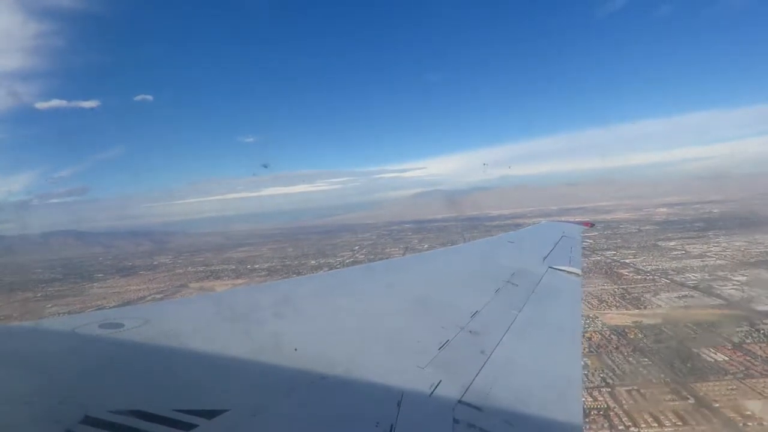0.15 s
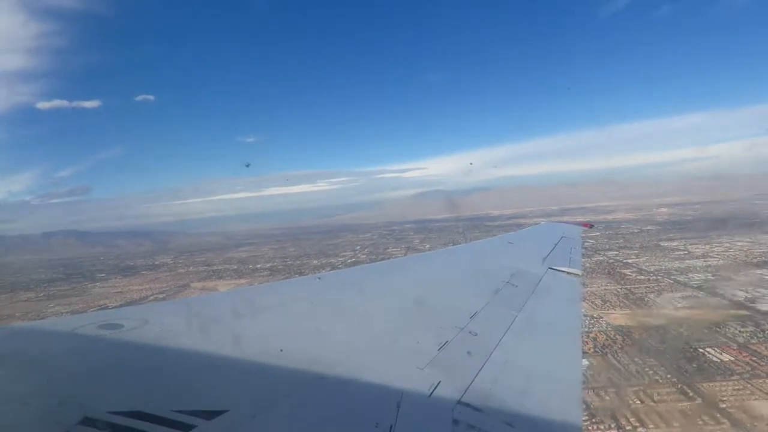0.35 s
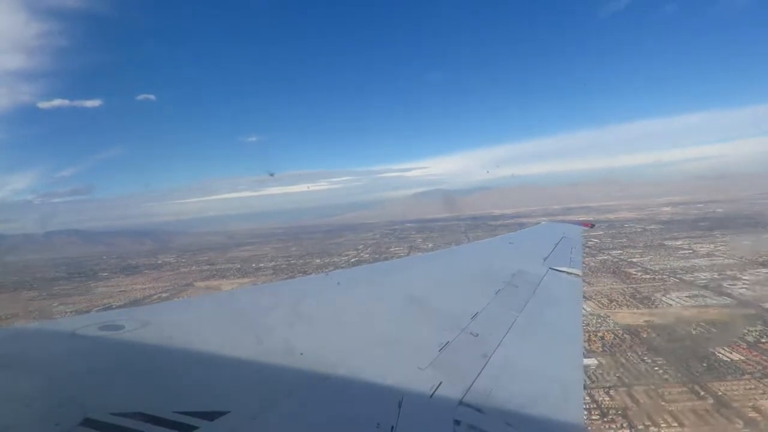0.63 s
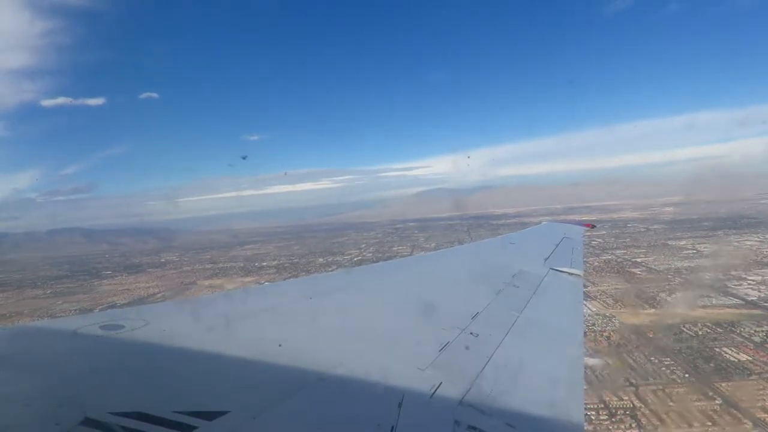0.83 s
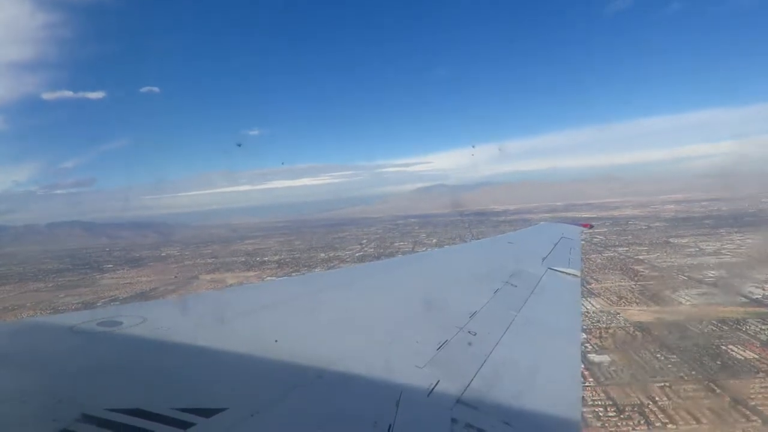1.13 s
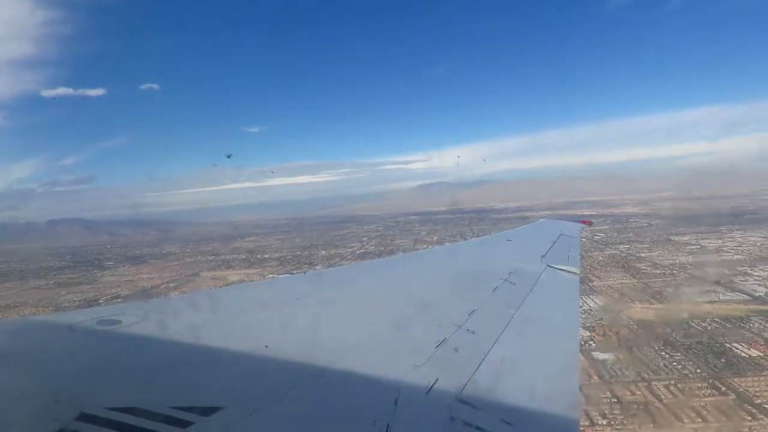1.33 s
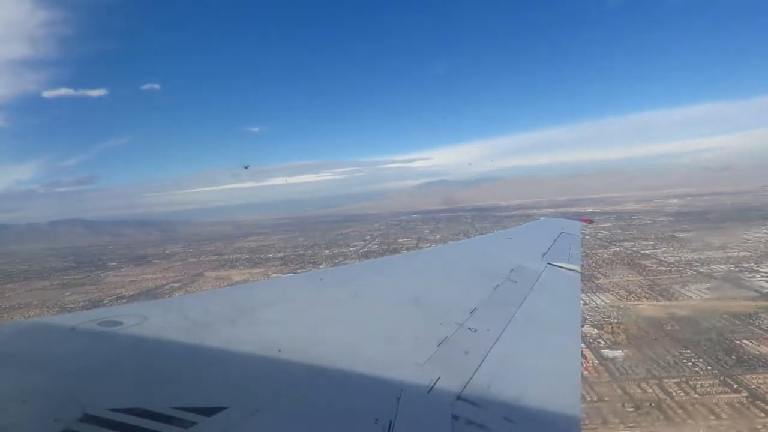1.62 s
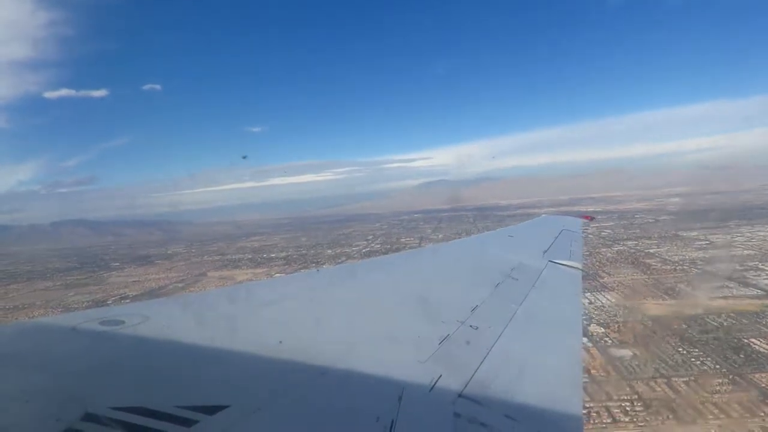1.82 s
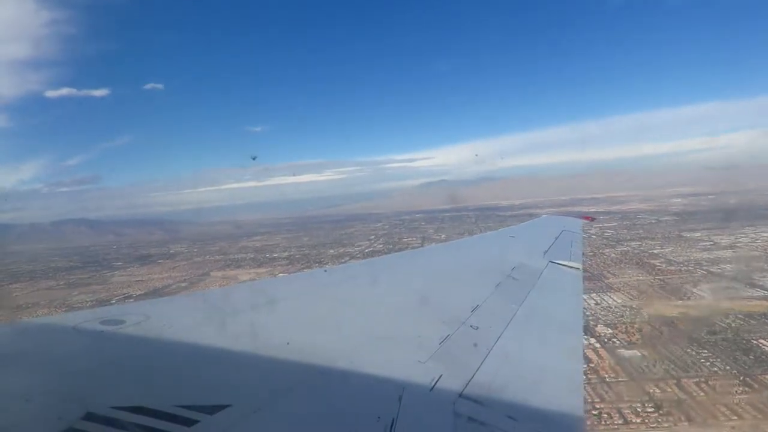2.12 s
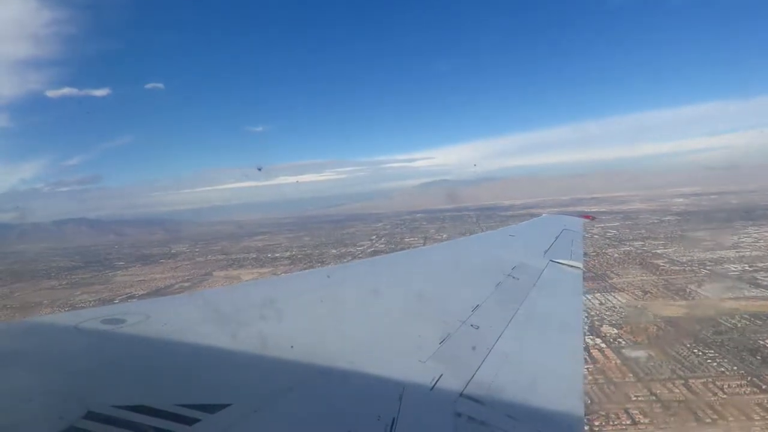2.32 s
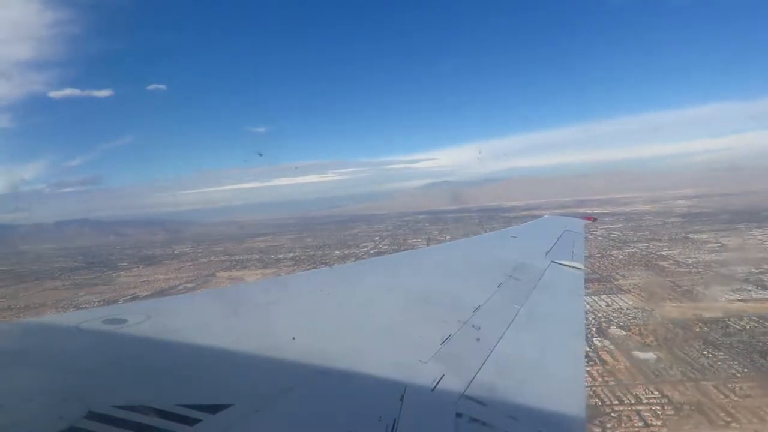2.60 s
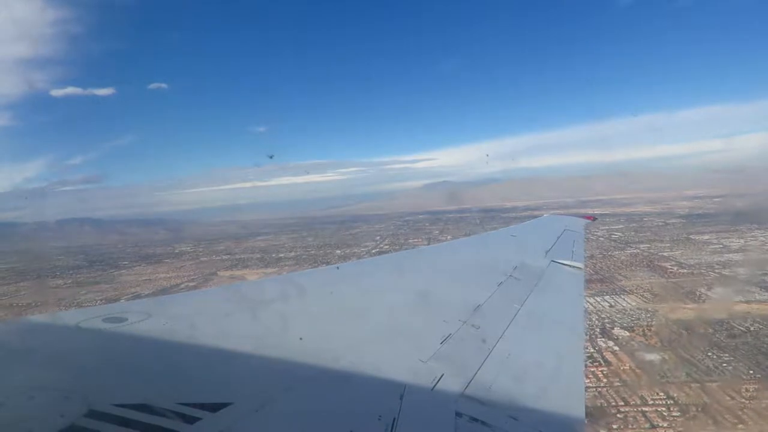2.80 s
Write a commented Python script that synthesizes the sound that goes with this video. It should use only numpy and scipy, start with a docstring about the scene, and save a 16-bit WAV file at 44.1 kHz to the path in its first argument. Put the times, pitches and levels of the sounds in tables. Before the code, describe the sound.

A loud, steady low jet drone fills an airliner cabin, two engine hums slowly beating beneath rumbling, rushing air and soft vent hiss; a few tiny rustles brush close to the microphone.

```python
"""A steady roar and hiss in an airliner cabin during climb, over the slow beating hum of two rear engines.
The engines run at slightly different speeds, so their sine shaft tones beat; higher orders add a thin buzz.
Air rushing over the skin and the vent hiss are noise built from random short-time spectra.
Something small rustles near the microphone a few times: brief puffs of band-passed noise."""
import sys
import numpy as np
from scipy import signal
from scipy.fft import rfft, irfft
from scipy.io import wavfile
from scipy.ndimage import uniform_filter1d, minimum_filter1d

SR = 44100
rng = np.random.default_rng(int(sys.argv[2]) if len(sys.argv) > 2 else 0)


def volts_from_db(level):
    """Convert decibel levels to linear amplitude ratios."""
    exponent = np.asarray(level, float) / 20
    return 10 ** exponent


def dump_mix(stems):
    """Bounce the given channels to the path in sys.argv[1] as a 16-bit WAV at rate SR."""
    frames = np.atleast_2d(stems).T  # one column per channel
    limited = np.clip(frames, -1, 1)  # hard clip at full scale
    pcm = np.round(limited * 32767).astype(np.int16)
    wavfile.write(sys.argv[1], SR, pcm)


N = 130095


def evened(x):
    """Scales to rms 1."""
    return x / np.sqrt(np.mean(x ** 2) + 1e-20)


def read(points, hz):
    """Reads a spectrum table on a log-frequency axis."""
    f, value = np.transpose(points)
    return np.interp(np.log(hz + 1), np.log(f + 1), value)


def drift(top_hz, count):
    """Slow random curves of rms 1: sines over a decade of rates, the slower ones stronger."""
    t = np.arange(0, N + 256, 256) / SR
    rates_hz = np.geomspace(top_hz / 10, top_hz, num=16)[:, None]
    turns = rates_hz * t + rng.random((count, 16, 1))
    slow = (np.sin(2 * np.pi * turns) / np.sqrt(rates_hz)).sum(axis=1)
    return [np.interp(np.arange(N) / SR, t, evened(row)) for row in slow]


def air(spectrum, level, patchy_db, flicker_db, size):
    """Stereo noise from random short-time spectra, with drifting patches and a flicker across all bins."""
    # left-minus-right part against the middle: (frequency [Hz], level [dB])
    side_share = [(30, -35.5), (60, -35), (99, -31.5), (160, -22), (270, -18.5), (450, -14), (740, -14.5),
                  (1220, -13.5), (2010, -8.5), (3330, -12), (5500, -7), (9080, -0.5), (11500, 0.5)]
    # the same, continued into the high treble: (frequency [Hz], level [dB])
    side_treble = [(13300, 2), (13900, 6), (15700, 12)]
    # channel balance: (frequency [Hz], left over right [dB])
    left_over_right = [(60, 0.5), (110, 0.5), (200, 1), (380, -3), (700, 0.5), (1290, -0.5), (2380, 0),
                       (4400, -0.5), (8120, 0.0), (15000, 0)]
    hop = size // 4
    frames, hz = N // hop + 5, np.fft.rfftfreq(size, 1 / SR)
    a, b, c, d, patches = rng.standard_normal((frames, len(hz), 5)).T  # each (bins, frames)
    patches = uniform_filter1d(patches, size=10, axis=0)
    patches = evened(uniform_filter1d(patches, size=8, axis=1))
    flicker = evened(uniform_filter1d(rng.standard_normal(frames), size=3))
    mid = a + 1j * b
    side = volts_from_db(read(side_share + side_treble, hz))[:, None] * (c + 1j * d)
    z = np.array([mid + side, mid - side])
    z = z * volts_from_db(read(spectrum, hz)[:, None] + patchy_db * patches + flicker_db * flicker)
    z = z * volts_from_db(np.outer([.5, -.5], read(left_over_right, hz)))[:, :, None]
    sound = evened(signal.istft(z, nperseg=size, noverlap=size - hop)[1][:, :N])
    return sound * volts_from_db(np.interp(np.arange(N) / SR, *np.transpose(level)))


def vent_hiss():
    """Vent air: broad noise, mostly above 1 kHz, falling off toward the treble."""
    # spectrum: (frequency [Hz], relative density [dB])
    spectrum = [(300, -60), (760, -26), (1300, -5.5), (1670, -5.5), (2010, -4), (2180, -7.5), (2500, -5.5),
                (2690, -9), (3110, -6), (3740, -10.5), (4400, -13), (5200, -12), (5750, -13), (6290, -20.5),
                (7580, -26), (8850, -25.5), (11000, -38.5)]
    # the same, continued into the high treble: (frequency [Hz], relative density [dB])
    treble = [(13300, -36), (13900, -43), (15700, -54)]
    # loudness course: (time [s], level [dB])
    level = [(0, -49), (.55, -45.5), (.8, -48.5), (1.1, -45), (1.3, -49.5), (1.75, -45), (1.85, -49.5),
             (2.1, -45.5), (2.27, -49.5), (2.5, -46.5), (2.95, -46)]
    return air(spectrum + treble, level, patchy_db=1.1, flicker_db=.45, size=512)


def air_roar():
    """Rushing air, middle band: noise strongest from about 400 to 700 Hz."""
    # spectrum: (frequency [Hz], relative density [dB])
    spectrum = [(100, -79.5), (250, -40.5), (340, -16), (430, -3.5), (500, -2.5), (545, -8.5), (710, -2),
                (810, -14), (960, -10), (1130, -17.5), (1400, -22), (1700, -32), (2300, -63)]
    # loudness course: (time [s], level [dB])
    level = [(0.03, -30.5), (0.87, -30), (1.2, -26.5), (1.34, -33), (1.79, -29.5), (1.81, -32.5),
             (2.09, -27), (2.25, -33), (2.52, -31.5), (2.62, -29.5), (2.64, -32.5), (2.92, -28.5)]
    return air(spectrum, level, patchy_db=-0.5, flicker_db=1.57, size=1024)


def air_body():
    """Rushing air, low-middle band: noise strongest near 150 Hz."""
    # spectrum: (frequency [Hz], relative density [dB])
    spectrum = [(20, -70), (100, -24), (135, 1), (160, 0.5), (180, -5.5), (205, -10), (240, -8),
                (280, -8.5), (330, -9.5), (390, -13), (440, -21.5), (520, -29), (700, -79)]
    # loudness course: (time [s], level [dB])
    level = [(0, -18.5), (.65, -18), (.95, -19), (1.12, -14.5), (1.429, -22), (1.721, -18), (1.881, -20),
             (2.18, -16), (2.359, -21), (2.66, -15.5), (2.8, -22.5), (2.95, -14.5)]
    return air(spectrum, level, patchy_db=-0.17, flicker_db=1.03, size=2048)


def wall_rumble():
    """Air rushing over the skin, heard through the wall: noise strongest near 50 to 130 Hz."""
    # spectrum: (frequency [Hz], relative density [dB])
    spectrum = [(20, -34), (32, -27), (42, -15), (52, -4.5), (68, -5), (88, 3.5), (110, 4), (126, 10.5),
                (145, -5.5), (170, -8), (220, -64.5)]
    # loudness course: (time [s], level [dB])
    level = [(0, -18.5), (0.401, -20), (.8, -19.5), (1.15, -19.5), (1.42, -22.5), (1.58, -18.5),
             (1.7, -15.5), (1.8, -19.5), (2.0, -20.5), (2.2, -22), (2.6, -16), (2.95, -21)]
    return air(spectrum, level, patchy_db=0.74, flicker_db=-0.3, size=4096)


def rustles():
    """Short soft puffs of noise, each in its own band, swelling and fading."""
    # puffs: (start [s], length [s], level [dB], centre [Hz], width [Hz])
    puffs = [(1.14, .042, -48, 3100, 1300), (1.143, .036, -45, 1700, 1600), (1.147, .024, -57, 4800, 1600),
             (1.205, .03, -51, 2200, 1800), (1.866, .022, -48, 2700, 1100), (1.886, .022, -58, 5500, 2200),
             (2.165, .034, -56, 4050, 160)]
    out = np.zeros(N)
    for start_s, length_s, db, hz, width_hz in puffs:
        edges_hz = [hz - width_hz / 2, hz + width_hz / 2]
        band = signal.butter(3, edges_hz, "bandpass", fs=SR, output="sos")
        at, size = round(start_s * SR), round(length_s * SR)
        noise = signal.sosfilt(band, rng.standard_normal(2 * size))[size:]  # filter settled
        out[at:at + size] += volts_from_db(db) * evened(noise * np.hanning(size))
    return out


def tone(turns, db, waver):
    """A sine that follows a count of turns, its level wavering a little."""
    waver_db = 1.8
    return np.sqrt(2) * volts_from_db(db + waver_db * waver) * np.sin(2 * np.pi * turns)


def cores_and_accessories():
    """Core shafts and accessories hum as single tones with slowly wandering phase."""
    # core shafts: (frequency [Hz], level [dB rms])
    cores = [(189.6, -33), (191.6, -32)]
    # accessories: (frequency [Hz], level [dB rms])
    accessories = [(503.5, -38), (878.8, -57), (932.1, -45), (1864.1, -68)]
    t, out, tones = np.arange(N) / SR, np.zeros(N), cores + accessories
    wavers, wanders_turns = drift(2.7, count=len(tones)), 0.038 * np.array(drift(1.5, count=len(tones)))
    for (hz, db), waver, wander in zip(tones, wavers, wanders_turns):
        out += tone(hz * t + wander + rng.random(), db, waver)
    return out


def fans():
    """Both fan shafts share one set of order phases and turn at their own speed, so their tones beat."""
    # tones of fan A: (multiple of shaft speed, level [dB rms])
    orders_a = [(1, -22), (2, -29.5), (3, -35), (4, -47), (10, -61), (11, -56), (13, -67), (14, -66),
                (15, -60), (16, -66), (17, -69), (18, -73), (20, -78), (23, -79), (25, -69), (26, -66),
                (27, -72), (28, -73), (29, -71), (30, -73), (31, -78), (32, -76), (33, -79), (34, -73),
                (35, -83), (37, -79), (38, -76), (39, -78), (40, -76), (43, -79), (49, -78)]
    # tones of fan B: (multiple of shaft speed, level [dB rms])
    orders_b = [(1, -28), (2, -29), (3, -34.5), (4, -49), (5, -51), (6, -51), (13, -66), (15, -73),
                (16, -62), (17, -62), (19, -66), (21, -76), (24, -75), (28, -78), (31, -82), (34, -76),
                (36, -83), (38, -84)]
    speeds_hz, in_step_s, wander_turns = (119.36, 121.62), 1.346, .012
    third_lags_turns = (0, .33)  # fan B's third tone comes through the wall this much late
    t, phase_turns, out = np.arange(N) / SR - in_step_s, rng.random(64), np.zeros(N)
    wanders = drift(0.79, count=2)
    for hz, orders, lag, wander in zip(speeds_hz, (orders_a, orders_b), third_lags_turns, wanders):
        shaft_turns = hz * t + wander_turns * wander
        for (k, db), waver in zip(orders, drift(2.985, count=len(orders))):
            turns = k * shaft_turns + phase_turns[k] - lag * (k == 3)
            out += tone(turns, db, waver)
    return out


def widened(x):
    """Two close microphones hear a fixed source with a small phase lag that changes with frequency."""
    # left-minus-right part against the middle: (frequency [Hz], level [dB])
    tone_side = [(120, -30), (190, -25), (240, -17.5), (360, -19), (503, -33), (880, -16), (1300, -16),
                 (1800, -18), (2100, -13), (3100, -16), (5000, -12)]
    share = volts_from_db(read(tone_side, np.fft.rfftfreq(N, 1 / SR)))
    side = irfft(-1j * rfft(x) * share, N)  # a quarter turn late
    return np.array([x + side, x - side])


def scene():
    """Engines and rustles in the middle, rushing air and vents around."""
    around = wall_rumble() + air_body() + air_roar() + vent_hiss()
    middle = fans() + cores_and_accessories() + rustles()
    return widened(middle) + around


def limited(x):
    """A peak limiter eases the gain of both channels down around the tallest swells."""
    ceiling, smoothing_s = .7, .012
    width = round(smoothing_s * SR)
    gain = np.minimum(ceiling / (abs(x).max(axis=0) + 1e-9), 1)
    gain = minimum_filter1d(gain, size=2 * width)
    gain = uniform_filter1d(uniform_filter1d(gain, size=width), size=width)
    return x * gain


def band_limit(x):
    """A steep low-pass at the top of the band."""
    return signal.sosfilt(signal.butter(12, 15740, fs=SR, output="sos"), x)


def record(dry):
    """Limits the peaks of the mix and returns the finished sound."""
    mix = limited(dry)
    return band_limit(mix)


dry = scene()
out = record(dry)
dump_mix(out)
```